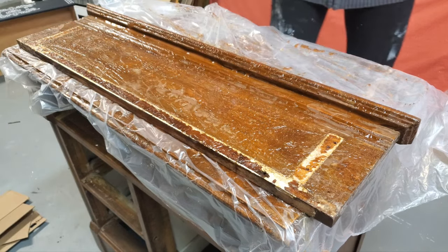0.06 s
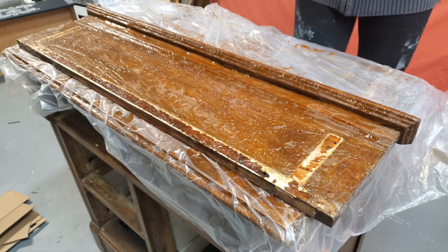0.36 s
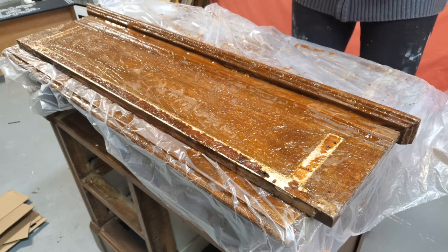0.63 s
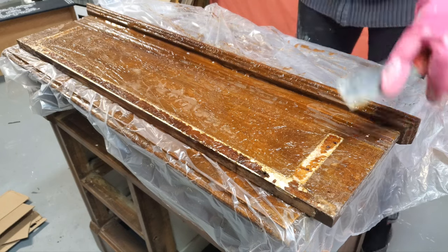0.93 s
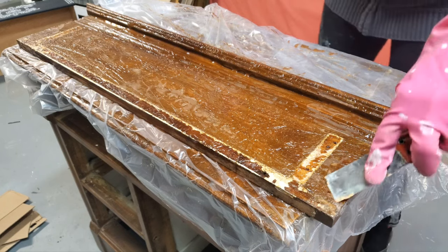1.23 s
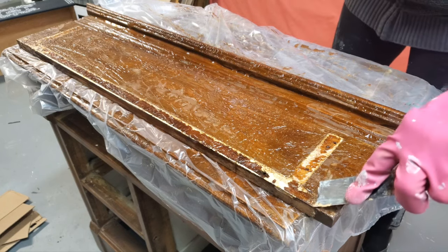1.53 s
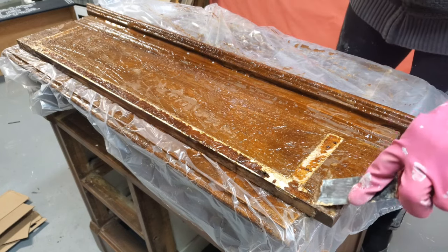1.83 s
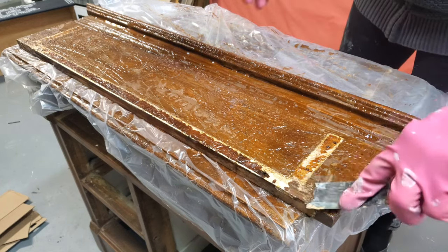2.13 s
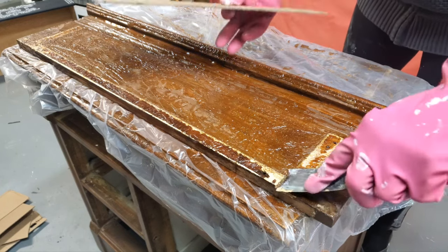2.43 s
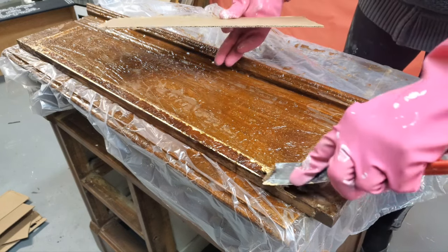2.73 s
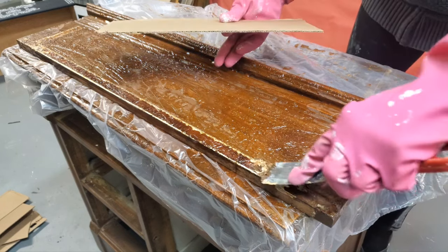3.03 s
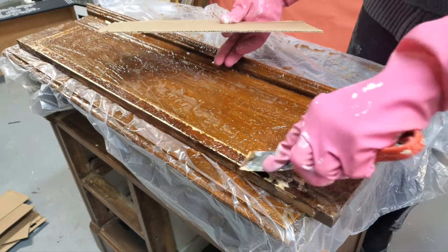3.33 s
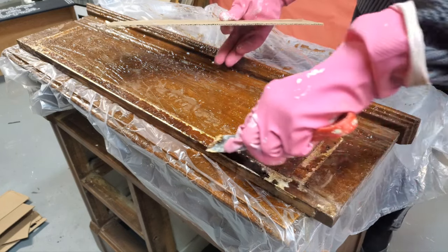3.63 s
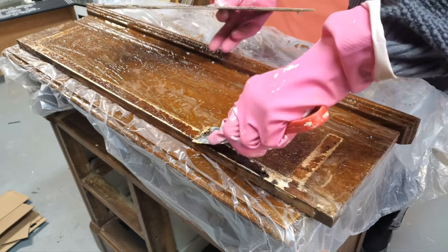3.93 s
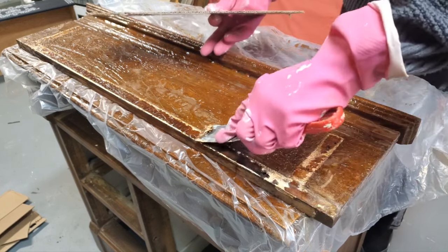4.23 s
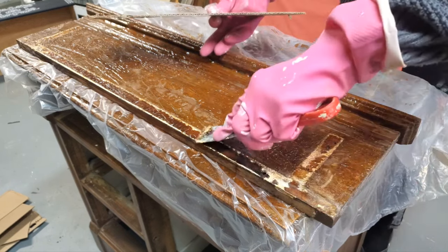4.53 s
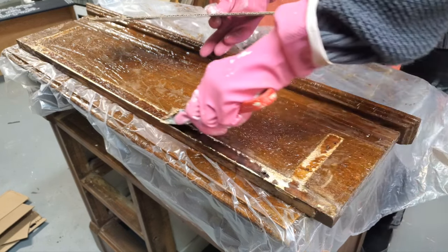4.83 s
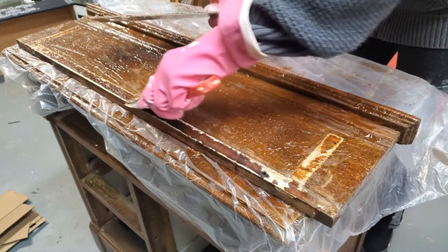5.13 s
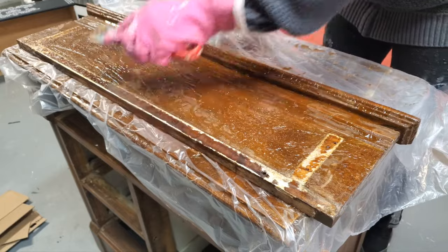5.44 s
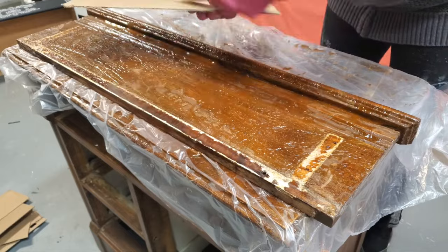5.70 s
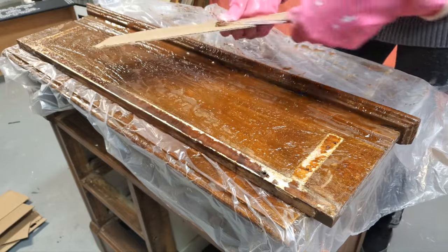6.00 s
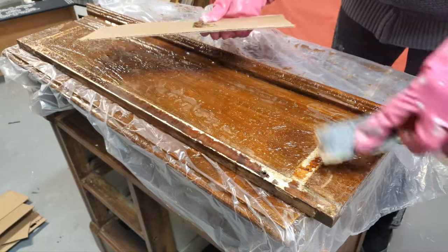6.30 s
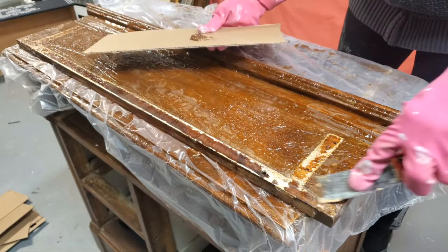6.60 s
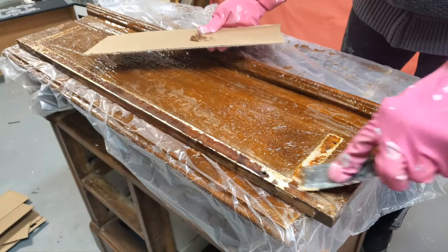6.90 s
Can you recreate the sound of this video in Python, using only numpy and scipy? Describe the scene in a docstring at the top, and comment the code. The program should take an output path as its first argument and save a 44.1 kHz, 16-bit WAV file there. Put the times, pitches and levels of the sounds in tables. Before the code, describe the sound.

A putty knife scrapes a wooden panel in short strokes, with snapping flakes, hollow knocks and blade wipes on cardboard, over a faint hum.

```python
"""A putty knife pushes softened finish off a wooden panel in short strokes, close to a stereo pair.
The blade sticks and slips, the panel booms on its bench and hard flakes snap off, as the knife
works from the right to just left of centre. Before and after, the blade is wiped on a hand-held
strip of cardboard and a sleeve rustles. The place is a workshop with a short echo, where a
distant motor hums low."""
import sys
import numpy as np
from scipy import signal
from scipy.fft import rfft, irfft, next_fast_len
from scipy.io import wavfile
from scipy.ndimage import uniform_filter1d, map_coordinates

SR = 44100
rng = np.random.default_rng(int(sys.argv[2]) if len(sys.argv) > 2 else 0)


def wav_record(signal):
    """Record a signal, one row per channel, as 16-bit PCM in the file named by sys.argv[1]."""
    frames = np.transpose(np.atleast_2d(signal))
    bounded = np.clip(frames, -1, 1)
    # unit amplitude maps onto the largest positive 16-bit level
    quanta = np.round(bounded * 32767).astype(np.int16)
    wavfile.write(sys.argv[1], SR, quanta)


N = 306936
RING_T = np.arange(SR // 2) / SR  # time axis of an impulse response
RING_HZ = np.fft.rfftfreq(len(RING_T), 1 / SR)

# the loose panel rocking on its bench: pitch_hz, level_db, t60_s
BENCH_MODES = [(83.35, 5.5, 0.43), (81, -5, 0.16), (118.2, 4.5, 0.26), (132.4, -1.5, 0.27),
               (147, -0.5, 0.16), (163.4, -2, 0.17), (174.4, -6.5, 0.26)]
# the panel bending: pitch_hz, level_db, t60_s
PANEL_MODES = [(224.7, -7, 0.097), (253.6, -5, 0.18), (269.8, -5.5, 0.14), (292, -6, 0.17),
               (334.4, -11.5, 0.098), (365.2, -11.5, 0.14), (399.1, -16, 0.2), (440, -12.5, 0.088),
               (510, -11, 0.1), (636, -12, 0.027), (861, -7, 0.016), (1149, -20, 0.064), (1370, -20, 0.025)]
# broad spectrum of the wood under the edge: frequency_hz, level_db
WOOD_COLOUR = [(300, -34), (480, -0.5), (600, 2.5), (800, 3), (1050, 3), (1500, -1), (2200, -5), (2900, -2),
               (3800, -10.5), (7000, -55.5)]
# resonances of that wood: pitch_hz, width_hz, gain_db
WOOD_RESONANCES = [(674, 40, -2), (860, 70, 1), (1040, 60, -5), (1160, 70, 2), (1361, 70, 4), (1540, 70, 3),
                   (1890, 90, 2.5), (2070, 150, 6), (2350, 250, -4)]
# resonances of the steel blade: pitch_hz, width_hz, gain_db
STEEL_RESONANCES = [(1527, 420, 11), (1856, 92, 5.5), (3224, 180, 6.5), (3920, 190, 4.5), (4570, 190, 4),
                    (5770, 260, 1), (6980, 460, 5.5), (10870, 340, 3)]


def amp(db):
    """Decibels to gain."""
    return 10 ** (np.asarray(db) / 20)


def unit(x):
    """Scale to rms 1."""
    return x / np.sqrt(np.mean(x ** 2) + 1e-20)


def along(points, hz):
    """Read (frequency_hz, value) points on a log axis."""
    frequencies, values = np.transpose(points)
    return np.interp(np.log(hz + 1), np.log(frequencies), values)


def timeline(points):
    """Join (time_s, value) points into one value per sample."""
    return np.interp(np.arange(N) / SR, *np.transpose(points))


def wobble(rate):
    """A smooth random curve of rms 1, rate knots a second."""
    knots = rng.standard_normal(int(N * rate / SR) + 4)
    return unit(map_coordinates(knots, [np.arange(N) * rate / SR]))


def add(track, start_s, sound):
    """Mix a sound into a track."""
    part = track[..., max(round(start_s * SR), 0):][..., :sound.shape[-1]]
    part += sound[..., :part.shape[-1]]


def through(x, response):
    """Play x through an impulse response."""
    return signal.fftconvolve(np.atleast_2d(x), np.atleast_2d(response), axes=1)[:, :N]


def stereo(mid, side, width):
    """Left and right from mid and side."""
    return mid + width * np.array([side, -side])


def pan(db):
    """Microphone gains for a left-minus-right level, fixed or moving."""
    return amp(np.reshape([db / 2, -db / 2], (2, -1)))


def delay_left(x, lag_s):
    """Sound from the right reaches the left microphone later."""
    return np.array([map_coordinates(x[0], [np.arange(N) - lag_s * SR]), x[1]])


def colour(points, peaks=()):
    """Causal response of energy 1 with a broad spectrum and resonant peaks on it."""
    peaks_db = sum(db / (1 + (2 * (RING_HZ - hz) / width) ** 2) for hz, width, db in peaks)
    cepstrum = irfft(np.log(amp(along(points, RING_HZ) + peaks_db)))
    cepstrum[1:] *= 2  # fold to minimum phase
    cepstrum[len(cepstrum) // 2:] = 0
    response = irfft(np.exp(rfft(cepstrum)))
    return response / np.linalg.norm(response)


def ring(modes):
    """Response of energy 1 of a body's decaying modes; neighbours swing in opposite senses."""
    response = np.zeros(len(RING_T))
    for k, (hz, db, t60_s) in enumerate(modes):
        decay = np.exp(-np.log(1000) * RING_T / t60_s)
        response += (-1) ** k * amp(db) * decay * np.sin(2 * np.pi * hz * RING_T)
    return response / np.linalg.norm(response)


def sing(hz, width_hz):
    """A resonance of rms 1 kept ringing by friction while its pitch moves."""
    band = signal.sosfilt(signal.butter(2, width_hz, fs=SR, output="sos"), rng.standard_normal((2, N)))
    phase = 2 * np.pi * np.cumsum(hz) / SR
    return unit(band[0] * np.cos(phase) + band[1] * np.sin(phase))


def grit(per_s, spread_db, smooth, alike):
    """Friction force: tiny fractures over a smooth rub; alike is the likeness of left and right."""
    fractures = rng.random(N) < per_s / SR
    sizes = unit(fractures * amp(spread_db * np.clip(rng.standard_normal(N), -2, 2)))
    mid, side = sizes * rng.choice([-1, 1], (2, N)) + smooth * rng.standard_normal((2, N))
    turn = np.arccos(alike) / 2
    return unit(stereo(np.cos(turn) * mid, side, np.sin(turn)))


def effort(strokes, responses, sag_db_per_s, curve):
    """Level in dB of each layer: a stroke swells, drifts and dies by that layer's lag and release."""
    t = np.arange(SR) / SR
    power = np.zeros((len(responses), N))
    for start, rise, length, *levels in strokes:
        attack = np.clip(t / rise, 0, 1) ** curve
        for track, db, (lag, release) in zip(power, levels, responses):
            fall_db = sag_db_per_s * np.maximum(t - rise, 0) + release * np.maximum(t - length, 0)
            add(track, start + lag, (attack * amp(db - fall_db)) ** 2)
    return 10 * np.log10(power + 1e-14)


def knocks(contacts, modes, cycles):
    """Each contact is a push and rebound of about a cycle, ringing the modes near its pitch."""
    track, body = np.zeros((1, N)), ring(modes)
    for start, db, hz in contacts:
        turns = hz * RING_T
        blow = through(turns * np.exp(-turns / cycles) * np.sin(2 * np.pi * turns), body)
        add(track, start, amp(db) * blow / np.abs(blow).max())
    return track


def motor_and_air(air_db=-71):
    """A distant motor hums, slightly unsteady, over the faint rush of the room."""
    # the motor's tones: pitch_hz, level_db
    tones = [(48.4, -68), (118.4, -71.5), (236.9, -79.5), (360.7, -84.5)]
    # room tone: frequency_hz, level_db
    air_colour = [(20, -22.5), (35, -24), (50, -10.5), (80, 0.5), (170, -8.5), (320, -18.5), (560, -24.5),
                  (1300, -36), (1800, -28), (2400, -34.5), (6500, -37.5), (8000, -41), (16000, -36.5)]
    t, hum = np.arange(N) / SR, np.zeros(N)
    for hz, db in tones:
        hum += amp(db + 0.72 * wobble(5.5)) * np.sin(2 * np.pi * hz * t + 0.56 * wobble(1.5))
    mid, side = through(rng.standard_normal((2, N)), colour(air_colour))
    return hum + amp(air_db) * stereo(mid, side, width=amp(-11))


def wiping(lowest_hz=310):
    """The blade rubs cardboard: a dull swish when limp, a ringing rasp when gripped; its note glides."""
    # wipes: start_s, rise_s, length_s, flex_db, rasp_db, hiss_db, first_flex_hz, last_flex_hz
    wipes = [ (0, 0.00029, 0.025, -59.5, -54, -62.5, 741, 683),
             (0.06, 0.1, 0.09, -65.5, -54, -58.5, 767, 730), (0.17, 0.025, 0.13, -67, -62, -71, 649.5, 640),
             (.3, 0.018, 0.095, -52.5, -58, -60, 799, 873.5),
             (.36, 0.026, 0.075, -70, -53, -58.5, 879.5, 803),
             (.43, 0.028, 0.12, -59.5, -52, -56.5, 620, 500),
             (0.526, 0.029, 0.048, -65, -51, -49.5, 480, 418),
             (0.577, 0.042, 0.0747, -74, -53, -58.5, 805, 890),
             (0.667, 0.11, 0.12, -48.5, -46, -52.5, 980, 691.2),
             (0.786, 0.012, 0.0659, -52.5, -51.5, -53.5, 600.2, 369),
             (5.861, 0.0013, 0.038, -50, -49, -54, 567, 543.6),
             (5.909, 0.017, 0.049, -49.5, -48.5, -56.5, 534, 598.4),
             (5.987, 0.0041, 0.15, -49, -51, -56, 700, 764.6),
             (6.115, 0.073, .08, -40, -41, -39, 739, 683.3),
             (6.197, 0.011, 0.058, -38, -43.5, -40, 1020, 1104)]
    # how the flexing sheet, its surface and its fibres follow a wipe: lag_s, release_db_per_s
    responses = [(0, 359), (0, 459.5), (0, 467.5)]
    # hold on the strip: time_s, firmness (0 limp, 1 firm)
    grip = [(.9, 0.14), (5.8, 0.9)]
    # rasp of firm cardboard: frequency_hz, level_db
    firm_colour = [(500, -19), (900, -11.5), (1300, -7), (1750, -5.5), (2200, -8), (2900, -9.5),
                   (3600, -10.5), (6000, -24)]
    # its resonances under the blade: pitch_hz, width_hz, gain_db
    firm_peaks = [(845, 40, 7), (1070, 60, 8), (2190, 50, 6), (2610, 70, 3), (2810, 60, 6), (3040, 40, 4)]
    # rasp of limp cardboard: frequency_hz, level_db
    limp_colour = [(300, -10), (550, -6), (900, -6.5), (1250, -6), (1800, -2), (3300, -7), (4300, -4.5),
                   (7000, -22)]
    # hiss of the fibres: frequency_hz, level_db
    hiss_colour = [(2000, -25), (3500, 0), (4600, -4), (6200, 5), (8200, -4), (11500, 1.5), (14000, -1.5),
                   (16000, -9)]
    flex_db, rasp_db, hiss_db = effort(wipes, responses, sag_db_per_s=29.5, curve=0.98)
    t, flex_hz = np.arange(N) / SR, np.zeros(N)
    for start, _, length, *_, first_hz, last_hz in wipes:
        glide_hz = np.interp(t, [start, start + length], [first_hz, last_hz])
        flex_hz = np.where(t >= start, glide_hz, flex_hz)
    firmness = timeline(grip)
    fibres = unit(amp(0.83 * wobble(60) + 1.5 * wobble(500)))
    flex = amp(flex_db - 0.5) * fibres * sing(flex_hz, width_hz=200)
    # a small sheet radiates no bass
    flex = signal.sosfilt(signal.butter(5, lowest_hz, "high", fs=SR, output="sos"), flex)
    rub = lambda db: amp(db) * fibres * grit(6000, spread_db=2, smooth=0.9, alike=0.08)
    rasp = through(np.sqrt(firmness) * rub(rasp_db), colour(firm_colour, firm_peaks))
    swish = through(np.sqrt(1 - firmness) * rub(rasp_db), colour(limp_colour))
    hiss = through(rub(hiss_db + 2.5), colour(hiss_colour))
    return (flex + rasp + swish + hiss) * pan(db=-1.5)


def flapping(release_db_per_s=300):
    """The limp cardboard gives under the blade with soft, toneless puffs."""
    # the strip giving way: start_s, rise_s, length_s, level_db
    flaps = [(0, .005, 0.047, -67), (.31, 0.063, 0.085, -60.5), (.46, 0.0087, 0.028, -55.5),
             (.525, 0.014, 0.016, -55.5), (.835, .015, .04, -69)]
    # spectrum of a puff: frequency_hz, level_db
    puff_colour = [(110, -16), (200, -4.5), (300, -1), (480, -1.5), (800, -14), (2000, -44)]
    level_db, = effort(flaps, [(0, release_db_per_s)], sag_db_per_s=30, curve=0.43)
    puffs = amp(level_db) * grit(3700, spread_db=3.5, smooth=0.66, alike=0.9)
    return through(puffs, colour(puff_colour))


def rustling(lag_s=0.0014, release_db_per_s=150):
    """Sleeve and glove rustle softly as the arm swings."""
    # arm swings: start_s, rise_s, length_s, level_db
    swings = [(0, 0.022, 0.2, -67), (.85, 0.044, 0.12, -71.5), (4.33, 0.024, 0.044, -81),
              (5.57, 0.06, 0.12, -66.5), (6.48, 0.032, 0.042, -68.5)]
    # spectrum of rubbing cloth: frequency_hz, level_db
    cloth_colour = [(700, -14), (1500, 9), (2600, 6), (4000, -2), (6500, 2), (8500, -8), (11500, -8.5),
                    (16000, -14)]
    level_db, = effort(swings, [(lag_s, release_db_per_s)], sag_db_per_s=-17.5, curve=0.48)
    rub = amp(level_db) * grit(2300, spread_db=-1.5, smooth=0.55, alike=0.11)
    return through(rub, colour(cloth_colour))


def squeaking(half_width=0.069, fade_share=0.43):
    """The blade brushes the cardboard in brief, narrow rasps that swell and fade."""
    # squeaks: start_s, length_s, level_db, pitch_hz
    squeaks = [(0.065, 0.11, -66, 1930), (.544, 0.037, -49, 4220), (0.551, 0.15, -61.5, 1760),
               (5.614, .08, -66, 2580), (5.604, 0.066, -75, 11100), (6.066, 0.11, -48.5, 2140),
               (6.15, 0.1, -40, 2260), (6.166, 0.049, -39.5, 2820)]
    track = np.zeros((2, N))
    for start, length, db, hz in squeaks:
        swell = signal.windows.tukey(round(length * SR), fade_share)
        noise = stereo(*rng.standard_normal((2, len(swell))), width=1.2)
        edges_hz = [hz * (1 - half_width), hz * (1 + half_width)]
        band = signal.butter(2, edges_hz, "band", fs=SR, output="sos")
        add(track, start, amp(db) * swell * unit(signal.sosfilt(band, noise)))
    return track


def tapping():
    """The knife knocks the cardboard strip, which rings briefly."""
    # taps: start_s, level_db, pitch_hz
    taps = [(.303, -46.5, 850), (.385, -42.5, 910), (.447, -40, 1810), (5.8683, -27.5, 564.2),
            (5.8687, -25.5, 2218), (5.8798, -34, 2192), (5.8925, -34.5, 520), (5.991, -37.5, 724),
            (6.1965, -11, 2396), (6.2035, -23.5, 1092), (6.2655, -24.5, 6370)]
    # modes of the strip: pitch_hz, level_db, t60_s
    card_modes = [(516, -6.5, 0.083), (609, -1.5, 0.025), (834, -2.5, 0.034), (998, 2.5, 0.022),
                  (1360, 9.5, 0.0064), (2156, 4.5, 0.018), (2700, 13.5, 0.0029), (3159, 7, 0.0084),
                  (5820, 2.5, 0.0061)]
    return knocks(taps, card_modes, cycles=0.38) * pan(db=-1)


def catches(per_s=80, gain=0.35, life_s=0.0041):
    """Gain on the friction: it jumps as the edge snags on a hard speck, then relaxes."""
    snags = (rng.random(N) < per_s / SR) * rng.uniform(0.17, 1.8, N)
    return 1 + gain * through(snags, np.exp(-RING_T / life_s))[0]


def shudder(force, modes):
    """A heavy body kept swinging by friction, at a level of 1 over each twelfth of a second."""
    swing = through(force, ring(modes))
    power = uniform_filter1d(np.mean(swing ** 2, axis=0), size=SR // 12)
    return swing / np.sqrt(np.abs(power) + 1e-9)


def waver(x, stray_s):
    """The hand's changing pressure pulls a body's modes slightly up and down."""
    index = np.arange(N) + stray_s * SR * wobble(8)
    return np.array([map_coordinates(side, [index], mode="mirror") for side in x])


def roam(x, depth_db):
    """As the edge moves over the surface, resonances come and go in patches."""
    spectra = signal.stft(x, nperseg=512)[2]
    patches = uniform_filter1d(rng.standard_normal(spectra.shape[1:]), size=3, axis=0)
    patches = unit(uniform_filter1d(patches, size=11, axis=1))
    return signal.istft(spectra * unit(amp(depth_db * patches)), nperseg=512)[1][:, :N]


def scraping(place, judder_db=2.5, lurch_db=2):
    """The edge catches and slips; the same uneven slips shake bench, panel, wood surface and blade."""
    # pushes of the knife: start_s, rise_s, length_s, boom_db, hollow_db, rasp_db, hiss_db
    pushes = [ (1.014, 0.0042, 0.071, -33.5, -51.5, -49, -64), (1.14, 0.013, 0.046, -54, -66, -63.5, -70),
              (1.262, 0.041, 0.2, -59.5, -64.5, -59.5, -66), (1.462, 0.011, 0.051, -58, -61.5, -54.5, -60),
              (1.58, 0.0098, 0.13, -55, -62, -59.5, -66.5), (1.808, 0.012, 0.016, -74, -62, -65.5, -79),
              (1.9, 0.03, 0.29, -94, -84, -74.5, -76.5), (2.028, 0.03, 0.075, -43.5, -48.5, -48.5, -53.5),
              (2.18, 0.06, 0.11, -63, -61, -71, -60.5), (2.335, 0.016, 0.029, -57, -54.5, -54.5, -55),
              (2.405, 0.023, 0.035, -48, -52, -56.5, -60), (2.595, 0.044, 0.11, -57.5, -62, -67.5, -73),
              (2.693, 0.0087, 0.027, -60, -57.5, -62.5, -76.5), (2.876, 0.085, 0.081, -37, -38, -43, -54),
              (3.075, 0.036, 0.054, -54, -52.5, -57.5, -60), (3.18, 0.025, 0.022, -62, -47, -56, -65),
              (3.21, 0.045, 0.035, -43, -38, -42.5, -52), (3.33, .03, 0.12, -61.5, -83, -87, -74.5),
              (3.452, 0.031, 0.12, -66, -61.5, -60, -65.5), (3.555, 0.02, 0.028, -52, -52.5, -74, -70.5),
              (3.615, 0.015, 0.01, -58, -59, -72, -64), (3.675, 0.014, 0.13, -53, -54.5, -69, -67),
              (3.785, 0.026, 0.063, -37, -45, -58.5, -65.5), (3.916, 0.01, 0.082, -47, -44.5, -61, -64.5),
              (4.006, 0.0045, 0.041, -38, -51, -47, -54), (4.065, 0.015, 0.033, -55, -52, -58, -72),
              (4.482, 0.032, 0.022, -38.5, -47.5, -53.5, -66.5),
              (4.535, 0.0049, 0.011, -71, -61, -47.5, -53), (4.64, 0.033, 0.2, -56, -70, -86, -78),
              (4.768, 0.022, 0.061, -34, -36.5, -41, -47), (4.87, 0.01, 0.019, -39, -39, -43, -47.5),
              (5.0, 0.0061, 0.06, -38.5, -46.5, -52, -55.5), (5.09, 0.015, 0.18, -47, -50, -55, -57),
              (5.279, 0.0051, 0.021, -60, -66, -57, -49), (5.32, 0.011, 0.075, -55.5, -53.5, -59, -57.5),
              (5.403, 0.01, 0.032, -52, -47.5, -52, -56), (5.455, 0.0064, 0.01, -47.5, -45.5, -60, -60),
              (6.582, 0.0064, 0.063, -61, -57.5, -69, -84), (6.68, .015, 0.1, -80, -75, -68.5, -68),
              (6.764, 0.019, 0.032, -53, -53, -53, -61.5), (6.86, 0.057, 0.064, -58, -64, -74, -66)]
    # how bench, panel, wood surface and blade follow a push: lag_s, release_db_per_s
    responses = [(0.012, 121), (0.0011, 182.5), (0, 273), (0, 255.5)]
    # hiss of the blade: frequency_hz, level_db
    blade_colour = [(900, -22.5), (1600, 1), (2400, -18.5), (3200, 0.5), (4800, 1), (6500, -0.5),
                    (8500, -9), (11000, -5.5), (13500, -6), (16000, -13)]
    # the hand eases off once the edge is moving
    boom_db, hollow_db, rasp_db, hiss_db = effort(pushes, responses, sag_db_per_s=8.5, curve=0.58)
    slips = unit(amp(2.03 * wobble(70) + 2.02 * wobble(400)) * catches())

    # the bench booms in surges as the blade judders; slow rocking grows toward the panel's free end
    drag = slips * grit(1200, spread_db=-2, smooth=0.54, alike=0.96)
    slow_rocking = amp(-6 + 5 * place) * shudder(drag, BENCH_MODES[:2])
    fast_rocking = amp(-2.5 - 0.65 * place) * shudder(drag, BENCH_MODES[2:])
    judder = unit(amp(judder_db * np.minimum(wobble(22), 1)))
    boom = amp(boom_db - 1.5) * judder * (slow_rocking + fast_rocking)

    lurch = unit(amp(lurch_db * wobble(31)))
    bending = shudder(slips * grit(1000, spread_db=0, smooth=0.46, alike=0.86), PANEL_MODES)
    hollow = amp(hollow_db - 2) * lurch * waver(bending, stray_s=0.00133)

    wood_force = amp(rasp_db - 2.5) * slips * grit(900, spread_db=3, smooth=0.54, alike=0.66)
    steel_force = amp(hiss_db - 1.5) * slips * grit(1500, spread_db=-3, smooth=1, alike=0.075)
    rasp = roam(through(wood_force, colour(WOOD_COLOUR, WOOD_RESONANCES)), depth_db=1.5)
    hiss = roam(through(steel_force, colour(blade_colour, STEEL_RESONANCES)), depth_db=2)
    steel = hiss + blade_ring(rasp_db, hiss_db)
    return boom + hollow + rasp * pan(db=-0.5) + steel * pan(db=-2 * place)


def blade_ring(rasp_db, hiss_db, light_touch_db=-57, damping=0.14, flicker_db=4.5, bend=0.018):
    """Thin steel sings fitfully with friction, most freely under a light touch; grip shifts its modes."""
    # how the blade meets the wood: time_s, flatness (0 on its edge, 1 pressed flat)
    flatness = [(1.42, 0.6), (1.5, 1), (2.6, 1), (3.25, 0.92), (3.6, 0.078), (6.55, 0), (6.68, 0.85)]
    # the flat blade creeping and singing faintly between pushes: time_s, steadiness (0 to 1)
    creeping = [(1.86, 0.1), (1.95, 1), (2.3, 0.7), (2.85, 0.55), (2.95, 0.2)]
    edge_hz, flat_hz = (2086, 3900, 5860, 10760), (1822, 3120, 5610, 10670)
    edge_db, flat_db, creep_db = -10, -3.5, -72
    flat = timeline(flatness)
    mode_hz = [(edge + (pressed - edge) * flat) * (1 + bend * wobble(9))
               for edge, pressed in zip(edge_hz, flat_hz)]
    damped_db = damping * np.maximum(hiss_db - light_touch_db, 0)
    creep = amp(creep_db) * timeline(creeping)
    drives = [amp(rasp_db - 10) + 0.85 * creep, amp(hiss_db - 6.5) + 0.5 * creep,
              amp(hiss_db - 4.5), amp(hiss_db - 9)]
    ringing = np.zeros(N)
    for drive, hz, width_hz in zip(drives, mode_hz, (65, 110, 170, 380)):
        flicker = unit(amp(flicker_db * np.minimum(wobble(18), 1.5)))
        ringing += drive * flicker * sing(hz, width_hz)
    return amp(edge_db + (flat_db - edge_db) * flat - damped_db) * ringing


def bumping():
    """The knife bumps the panel, which bends and rocks on its bench."""
    # bumps: start_s, peak_db, pitch_hz
    bumps = [(1.023, -23.5, 89), (1.819, -51.5, 330), (2.882, -43, 250), (2.92, -35, 241),
             (3.211, -31, 270), (3.24, -30.5, 255), (3.774, -45, 287), (3.799, -65, 530),
             (3.932, -35.5, 146), (4.012, -41, 460), (4.4975, -35, 617), (4.512, -36.5, 107),
             (4.776, -29.5, 275), (4.792, -33.5, 254), (4.877, -32, 290), (4.8885, -33, 905),
             (5.007, -33, 240), (5.025, -30.5, 123), (5.083, -40, 372), (5.144, -39.5, 156),
             (5.185, -41.5, 106), (5.235, -40.5, 332), (5.281, -43, 257), (5.42, -43, 324),
             (5.464, -43, 284), (6.6, -48.5, 218)]
    return knocks(bumps, BENCH_MODES + PANEL_MODES, cycles=0.58)


def ticking(life_s=0.006, band_ratio=1.43):
    """The edge lands on bare wood and chatters for a few milliseconds, ringing the steel."""
    # landings: start_s, peak_db, pitch_hz, left_minus_right_db
    ticks = [(1.47, -37.5, 2460, -1), (1.631, -49, 1500, 2), (2.033, -39, 1570, 5.5),
             (2.067, -31.5, 1680, 3.5), (2.24, -50, 1680, -1), (2.264, -46.5, 1680, -4),
             (2.426, -39.5, 1700, -2), (2.695, -43.5, 1850, -2), (2.891, -41, 2220, -6),
             (2.9179, -32.5, 1680, 7), (2.9313, -32.5, 1880, -10), (2.949, -27, 2000, -0.5),
             (3.2113, -39.5, 1290, -5), (3.2407, -39, 2620, -15), (3.569, -43.5, 1380, 1),
             (3.624, -49, 1300, -5), (3.684, -51.5, 1480, 1), (3.823, -50, 1000, -8),
             (4.013, -34, 2140, -1), (4.016, -36.5, 2040, 0.5), (5.145, -30, 1610, -5),
             (5.279, -36, 1800, -5), (5.4187, -58, 1700, -7)]
    # spectrum of the chatter: frequency_hz, level_db
    tick_colour = [(600, -5), (1150, 12.5), (1600, -3), (2450, 4.5), (3300, -2), (8000, 0)]
    track, steel = np.zeros((2, N)), colour(tick_colour, STEEL_RESONANCES)
    for start, db, hz, side_db in ticks:
        mid, side = rng.standard_normal((2, len(RING_T))) * np.exp(-RING_T / life_s)
        band = signal.butter(2, [hz / band_ratio, hz * band_ratio], "band", fs=SR, output="sos")
        tick = through(signal.sosfilt(band, stereo(mid, side, width=0.88)), steel)
        add(track, start, amp(db) * pan(side_db) * tick / np.abs(tick).max())
    return track


def flaking(crack_s=0.0011, crumble_s=0.005, tear_s=0.007):
    """A hard flake cracks, then crumbles; the wood under it tears unevenly for a little longer."""
    # flakes snapping under the edge: start_s, level_db, wood_relative_db, left_minus_right_db
    flakes = [(1.4706, -37, -4, -0.5), (2.0657, -35, -27, -19), (2.088, -44.5, -14, -5.5),
              (2.2627, -35.5, -13, -12), (2.3526, -51, -15, -20), (2.4216, -41.5, -0.5, -8.5),
              (2.565, -55, 2.5, -2), (2.632, -48.5, -21, -9.5), (2.883, -40.5, -10, -5),
              (2.933, -40, -5, -12.5), (2.9471, -26, -11, -1), (3.055, -44, -24, -3.5),
              (3.111, -41.5, -18, -9.5), (3.498, -36.5, -26, -6), (3.7987, -40, 2.5, -4),
              (3.929, -48.5, 1, -12), (4.01, -33.5, 1, -3.5), (4.0134, -40, 3, -2), (4.0346, -41.5, 5, -9),
              (4.08, -53, 10, -9), (4.766, -45, 7, 2), (4.778, -35, -4, -8.5), (4.812, -34, -0.5, -2),
              (4.8189, -10.5, -11, -2), (4.8873, -30, 6.5, -1.5), (4.8904, -32.5, 3, 3),
              (4.909, -36.5, 5.5, 1.5), (4.9804, -34.5, 5, -2), (5.0345, -34, 1.5, 0), (5.053, -46, -8, 4),
              (5.0703, -39, 7, -2.5), (5.098, -24, -4, 0), (5.1434, -26, 1, -3.5), (5.1872, -36.5, 2.5, 0),
              (5.227, -45, 9.5, -2), (5.2787, -22, -17, -5), (5.284, -32, -1, -1), (5.2905, -29, -1, 2),
              (5.348, -41.5, 2.5, -1), (5.405, -40, 2.5, -9), (5.4265, -44, 2, -3), (5.4637, -43, 6, -4)]
    # the snap at the steel edge: frequency_hz, level_db
    snap_colour = [(900, -36), (2500, -21), (3800, 1.5), (4800, -3), (6200, 4.5), (9000, -6.5), (11000, 1),
                   (13500, -5), (16000, -9.5)]
    steel, wood = np.zeros((2, N)), np.zeros((2, N))
    t = RING_T[:SR // 20]
    crack = (t / crack_s) ** 2 * np.exp(2 - 2 * t / crack_s)
    snap = crack + amp(-23) * np.exp(-t / crumble_s)
    for start, db, wood_db, side_db in flakes:
        noise = stereo(*rng.standard_normal((2, len(t))), width=0.3) * pan(side_db)
        uneven = np.interp(t, np.linspace(0, t[-1], 30), rng.exponential(size=30))
        tear = amp(-15) * np.exp(-t / tear_s) * uneven
        add(steel, start, amp(db - 12) * snap * noise)
        add(wood, start, amp(db + wood_db - 11.5) * (snap + tear) * noise)
    return through(steel, colour(snap_colour)) + through(wood, colour(WOOD_COLOUR, WOOD_RESONANCES))


def workshop_echo(x, early_db=5, early_life_s=0.016, delay_s=0.002):
    """Bench and near walls answer at once, the workshop dies away after; echoes shift as hands move."""
    # decay of the room: frequency_hz, t60_s
    decay_times = [(100, 0.23), (500, 0.35), (2000, 0.34), (6000, 0.36), (15000, 0.28)]
    # strength of the echo: frequency_hz, level_db
    levels = [(80, -4), (250, -5.5), (600, 0), (1500, -6.5), (4000, -4), (15000, -11)]
    # how alike the echo is at the two microphones: frequency_hz, likeness (0 to 1)
    likeness = [(100, 1), (400, 0.86), (900, 0.39), (2000, 0), (15000, 0)]
    wet, hop = np.zeros((2, N)), SR // 3
    padded = np.pad(x, ((0, 0), (0, hop)))
    for start in range(0, N, hop):
        hz, t, noise = signal.stft(rng.standard_normal((2, SR // 2)), SR, nperseg=256)
        tail = np.exp(-np.log(1000) * t / along(decay_times, hz)[:, None])
        decay = tail + amp(early_db) * np.exp(-t / early_life_s)
        turn = np.arccos(along(likeness, hz)) / 2
        gain = amp(along(levels, hz)) * [np.cos(turn), np.sin(turn)] / np.linalg.norm(decay, axis=1)
        mid, side = signal.istft(noise * decay * gain[..., None], SR, nperseg=256)[1] / np.sqrt(len(hz))
        # neighbouring stretches cross-fade at constant power
        piece = padded[:, start:start + 2 * hop]
        piece = piece * signal.windows.cosine(2 * hop)[:piece.shape[1]]
        add(wet, start / SR + delay_s, through(piece, stereo(mid, side, width=1)))
    return wet


def scene():
    """The work at the bench, heard from close by, with the workshop behind it."""
    # the knife as seen from the microphones: time_s, place (0 ahead, 1 right, negative left)
    knife_path = [(1.0, 1), (2.2, 1), (3.4, 0.73), (4.1, 0.16), (4.8, -0.22), (5.4, -0.34), (6.6, 1)]
    place = timeline(knife_path)
    panel = scraping(place) + flaking() + ticking() + bumping()
    card = wiping() + flapping() + squeaking() + tapping()
    work = delay_left(panel, lag_s=0.00012 * place) + delay_left(card, lag_s=0.0001) + rustling()
    return work + workshop_echo(work) + motor_and_air()


def record(dry):
    """The recorder sheds the deepest bass and keeps nothing above its band limit."""
    low_hz, top_hz = 42.0, 16200
    size = next_fast_len(N + SR // 4)
    hz = np.fft.rfftfreq(size, 1 / SR)
    low_cut = hz ** 3 / np.sqrt(hz ** 6 + low_hz ** 6)
    return irfft(rfft(dry, size) * low_cut * (hz < top_hz), size)[:, :N]


dry = scene()
out = record(dry)
wav_record(out)
```